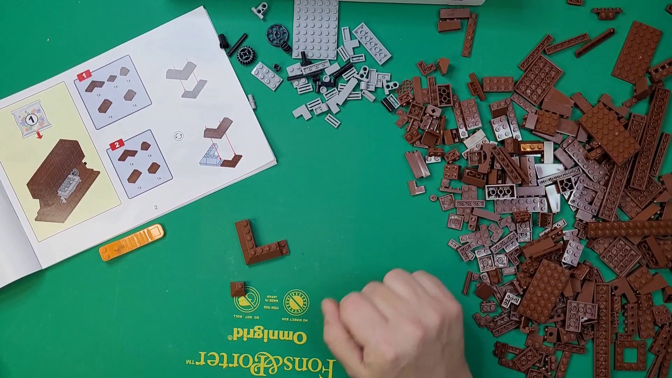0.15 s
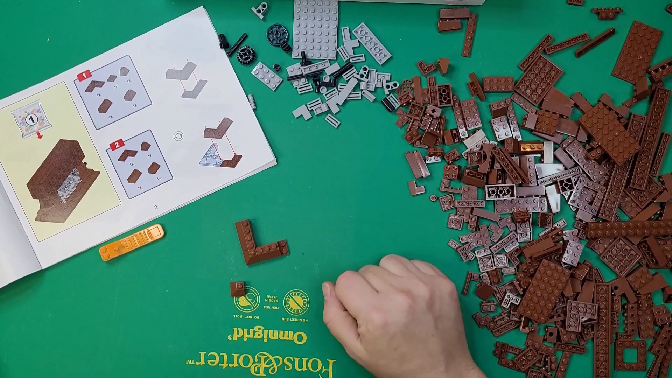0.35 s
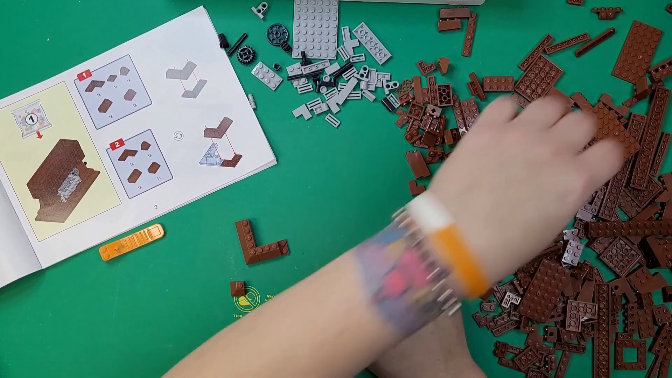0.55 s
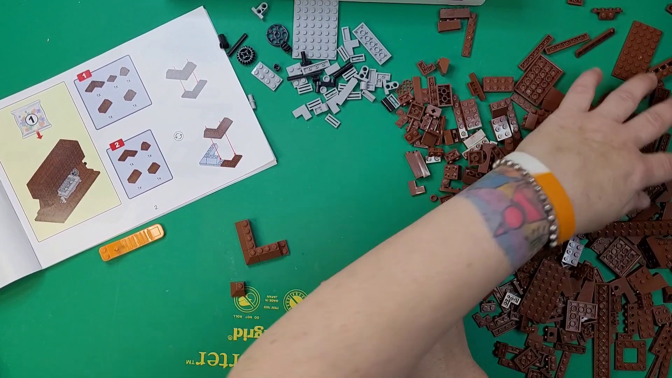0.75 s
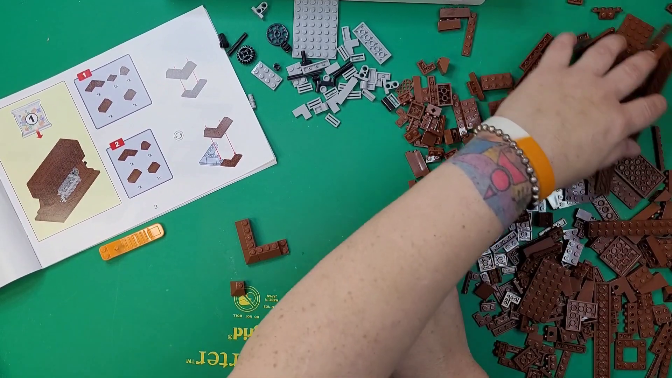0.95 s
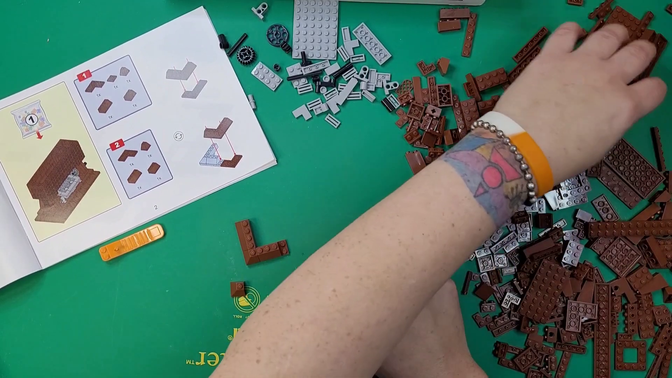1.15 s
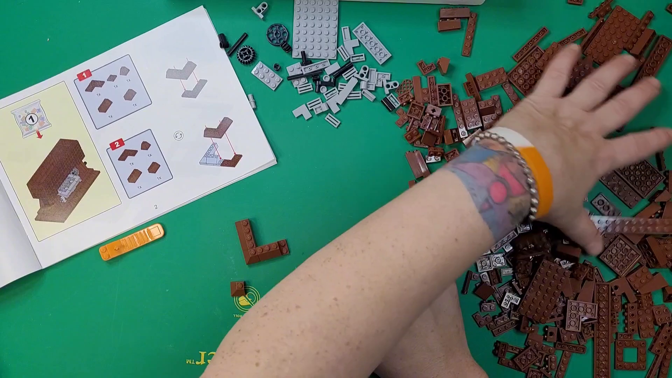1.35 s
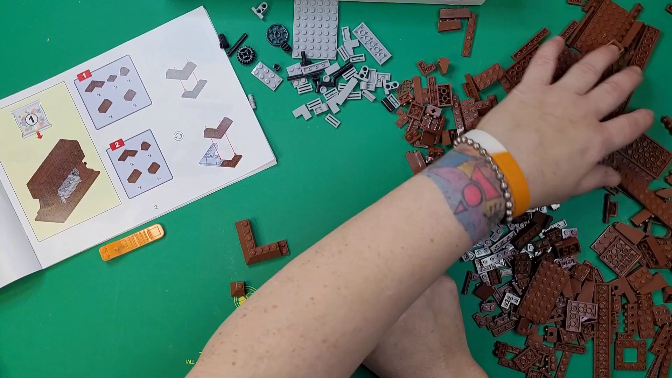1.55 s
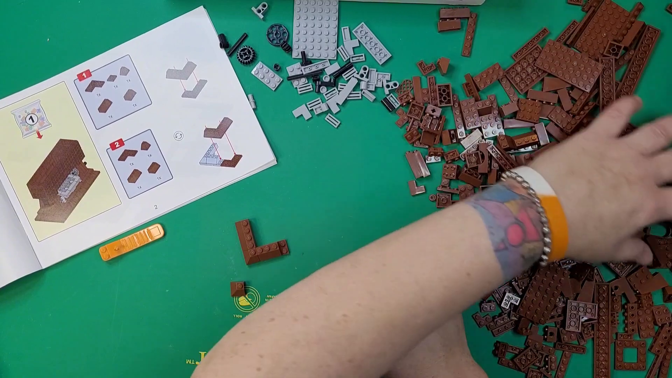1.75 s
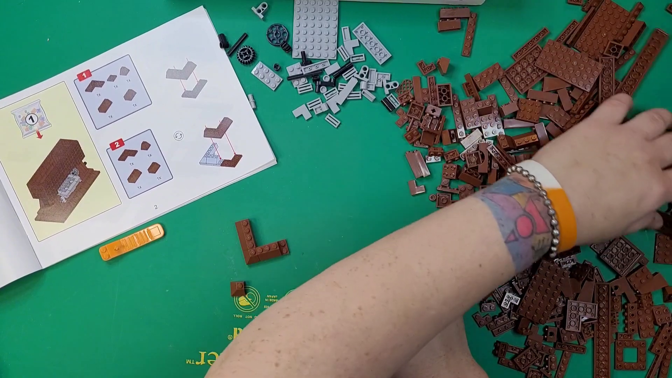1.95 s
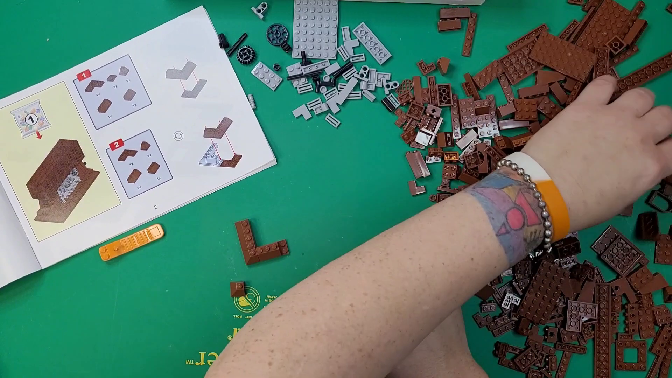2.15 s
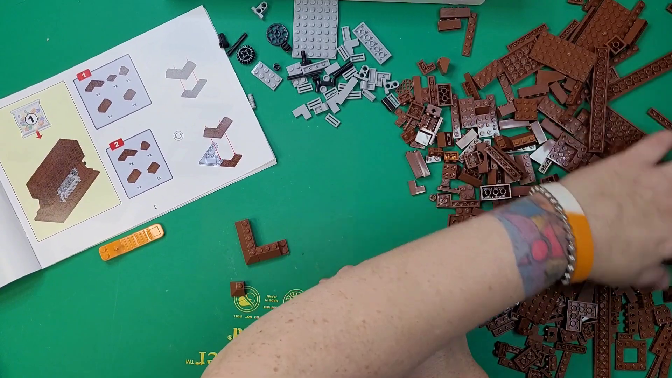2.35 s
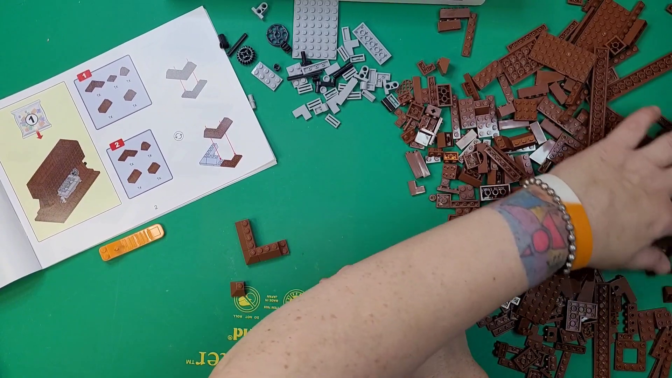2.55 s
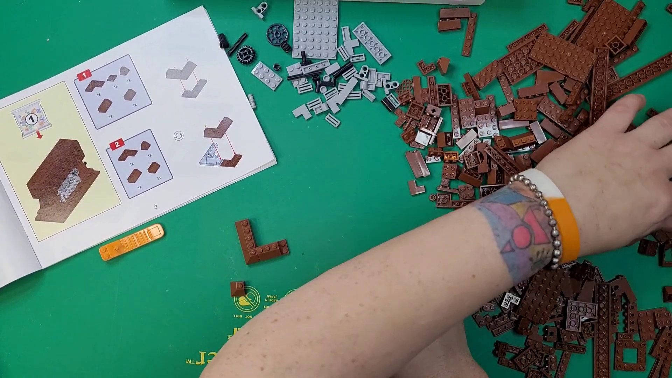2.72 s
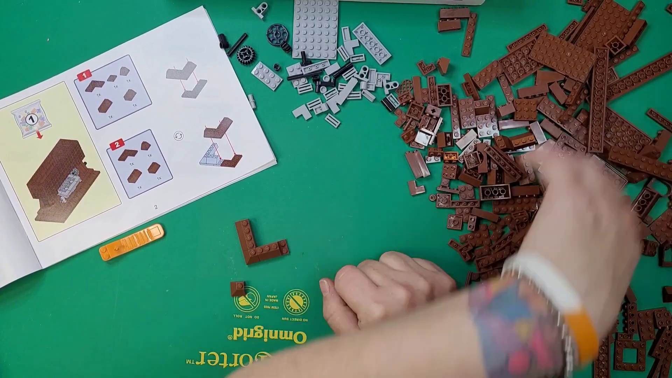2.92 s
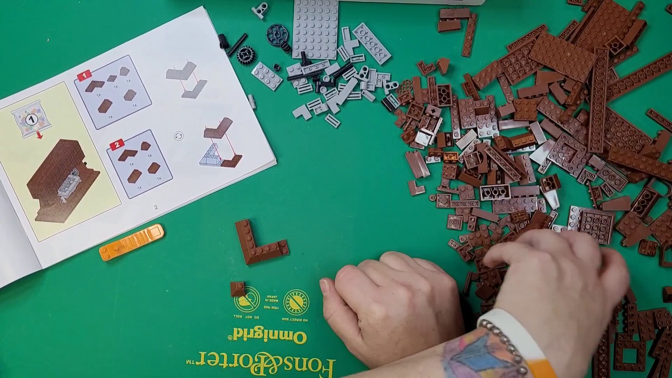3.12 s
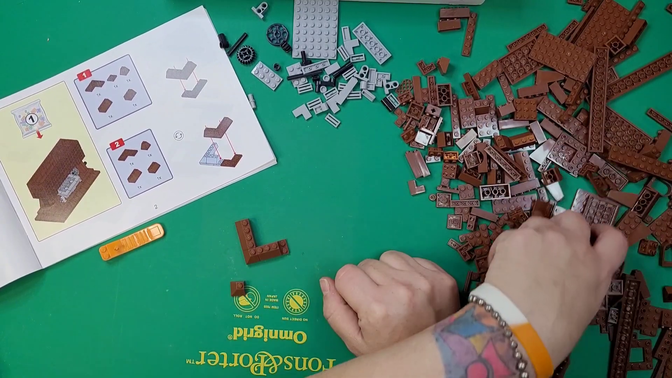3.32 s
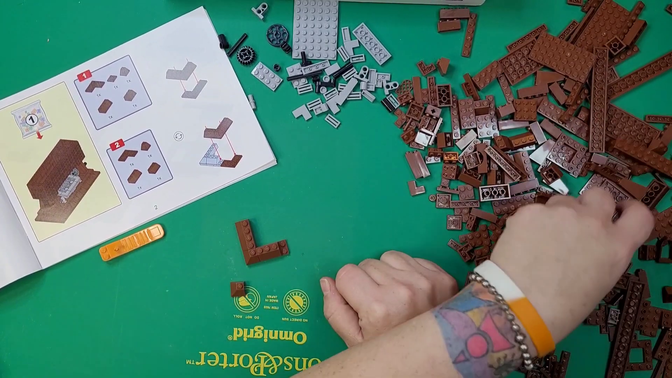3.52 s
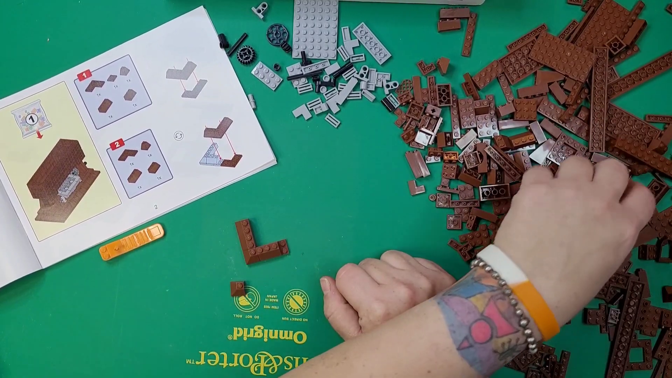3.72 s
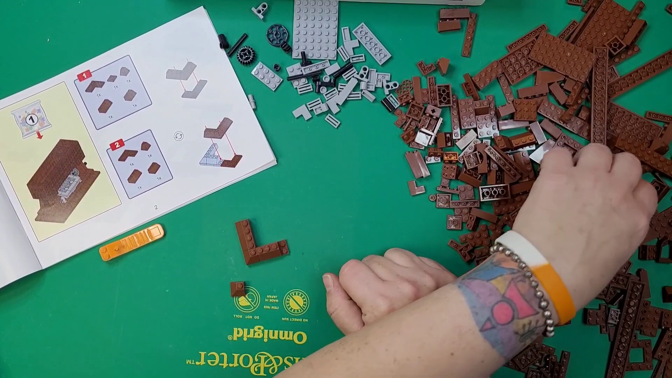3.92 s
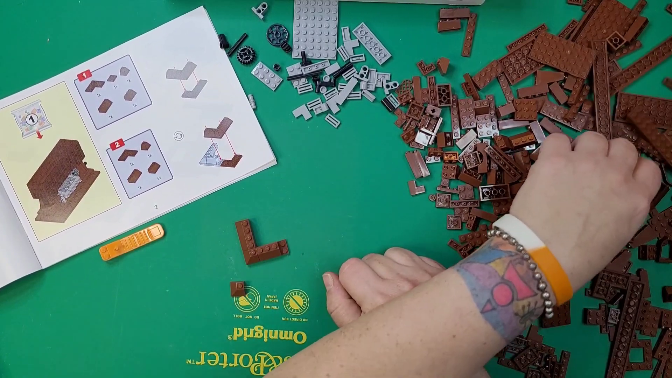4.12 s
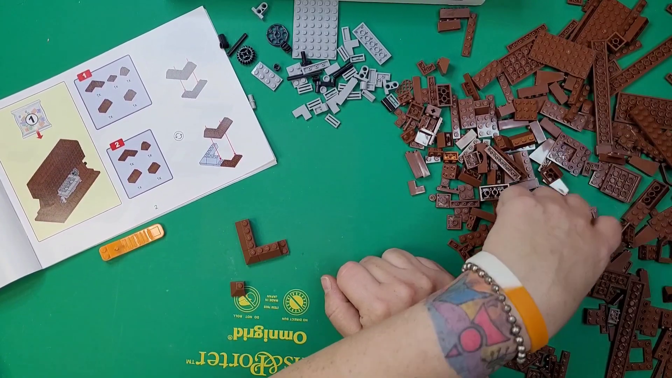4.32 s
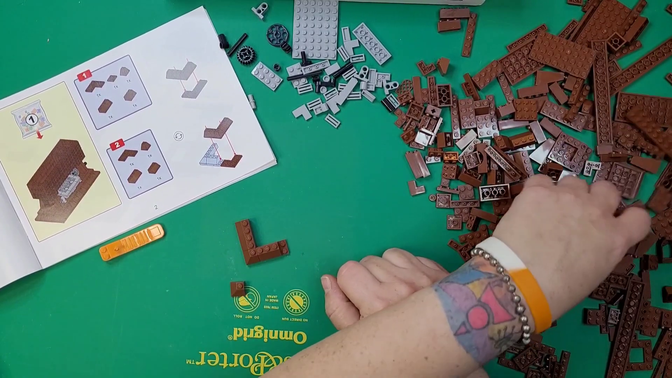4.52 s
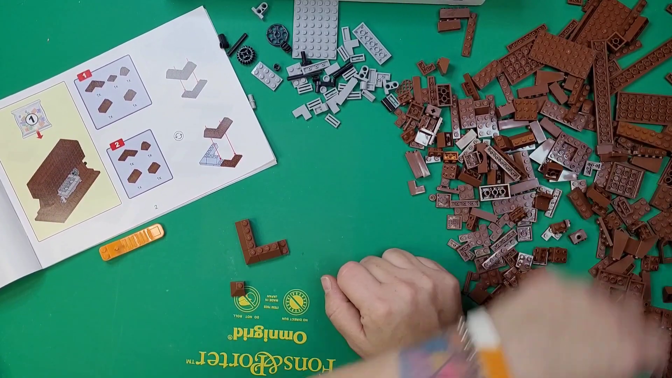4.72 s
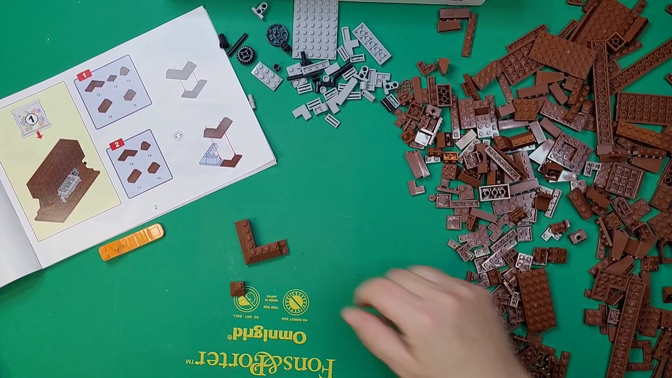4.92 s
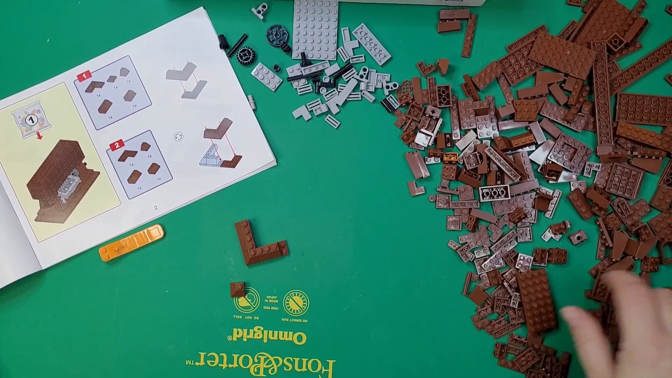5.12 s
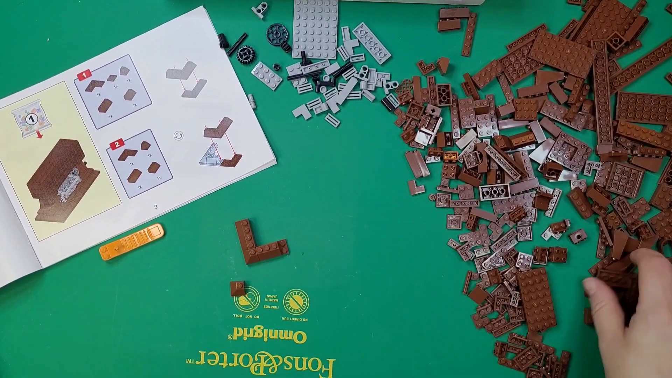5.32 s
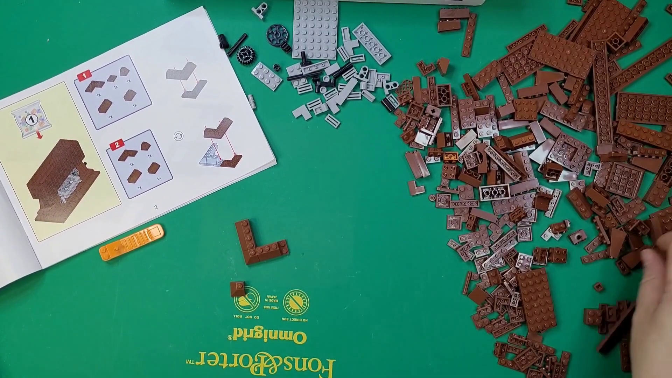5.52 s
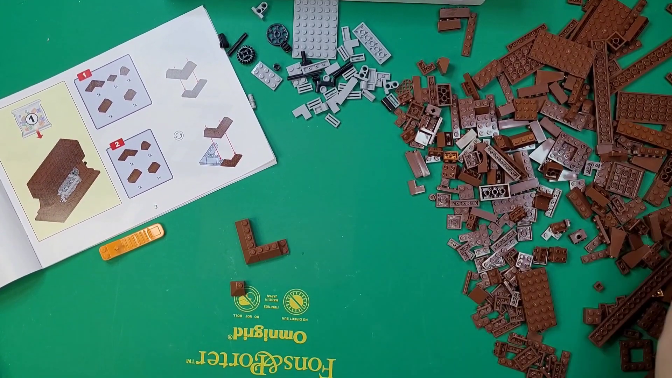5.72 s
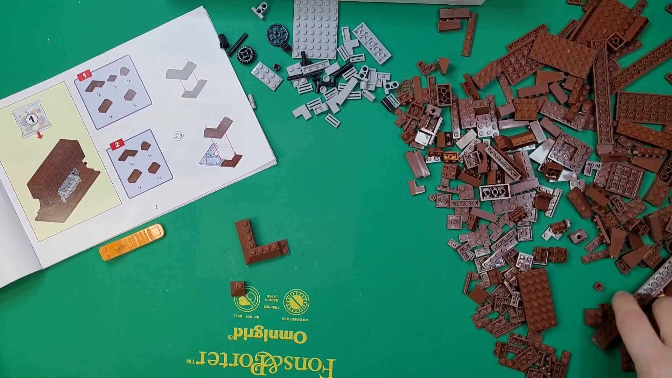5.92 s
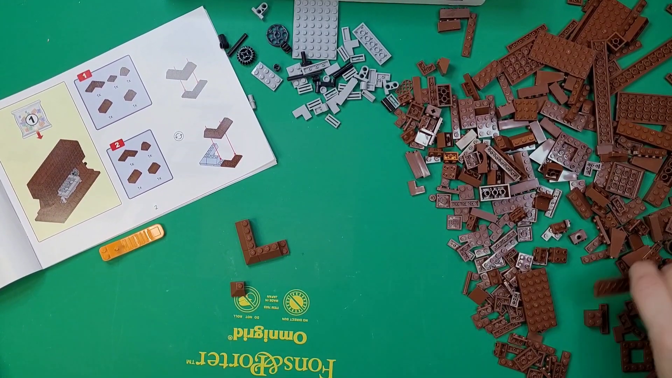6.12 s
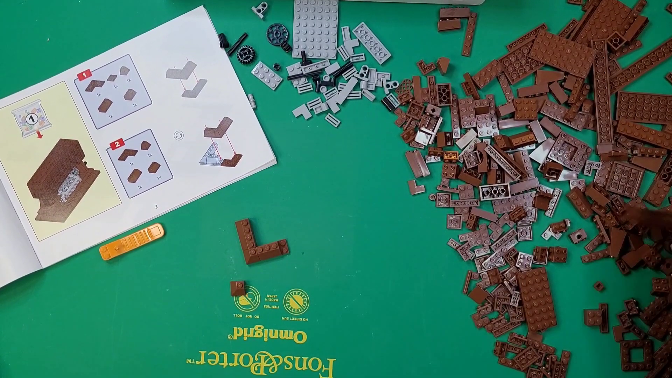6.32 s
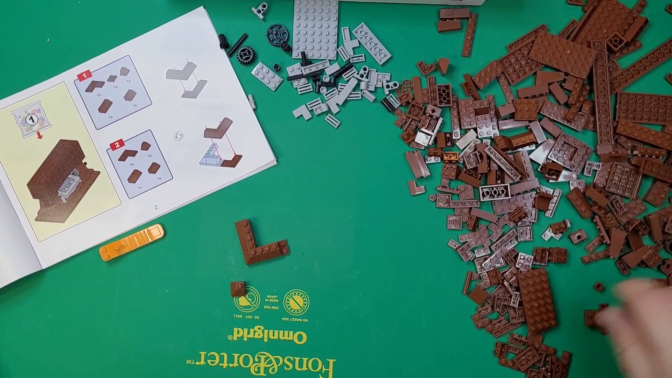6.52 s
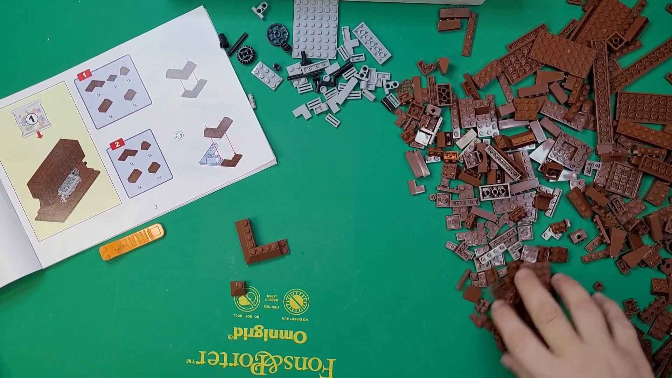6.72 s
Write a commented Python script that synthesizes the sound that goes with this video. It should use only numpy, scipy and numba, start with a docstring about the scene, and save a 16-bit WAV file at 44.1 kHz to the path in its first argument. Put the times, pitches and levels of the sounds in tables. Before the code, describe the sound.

Light plastic pieces patter, scrape and clack in irregular handfuls, nearer the left side. Quiet at first, then several rakes in a row, a gap around three seconds, more stirring with dull arm bumps on the table, a hush with skin brushing the mat, and a last run of crisp clicks that dies away. Dry, close and bright, with slight small-room echo and very faint rumble and hiss.

```python
"""A hand rakes through a heap of small hollow plastic bricks on a mat-covered table, in short sweeps.
Bricks patter as dying sines and a few clack loudly; scraping noise rings larger pieces and the table top.
Narrow-band noise makes pieces sing and a large plate knock; skin brushes the mat, palm and arm touch down.
Two microphone ports stand a few centimetres apart, the heap nearer the left one.
A small room answers the heap, over quiet rumble and hiss."""
import sys
import numpy as np
from scipy import signal
from scipy.fft import rfft, irfft, next_fast_len
from scipy.io import wavfile
from scipy.ndimage import uniform_filter1d
from numba import njit

SR = 44100
rng = np.random.default_rng(int(sys.argv[2]) if len(sys.argv) > 2 else 0)


def put_to_file(sound):
    """Save the sound as 16-bit audio at rate SR, in the file named by the first command-line argument."""
    columns = np.atleast_2d(sound).T  # one column per channel
    safe = np.clip(columns, -1, 1)
    whole_steps = np.round(safe * 32767)
    wavfile.write(sys.argv[1], SR, whole_steps.astype(np.int16))


N = 298160

# resonances of larger flat pieces: pitch_hz, width_hz, level_db
PLATE_MODES = [(947, 67, -14.5), (1227, 43, -3), (1468, 44, 2.5), (1663, 79, 10.5), (1923, 230, 4.5),
               (2360, 39, -5.5)]
# resonances of the table top, lowest first: pitch_hz, width_hz, level_db
TABLE_MODES = [(68, 23, -5.5), (127.8, 19.3, -3.5), (177.4, 7.9, -0.5), (257, 53, -1.5), (310, 33, 5.5),
               (493, 91, -17)]
# typical delay from left port to right, and how far places in the heap vary it
PORT_LAG_S, LAG_SPREAD_S = .00025, .00006


def sweeps():
    """Ticks, plates and table swell together; the heap slips in uneven little jolts."""
    # the heap gives way in surges; the shortest are brief clatter following a clack:
    # full_s (when fully up), rise_s, hold_s, fade_s (scaled per layer below),
    # clatter_db, then treble_db, plate_db, table_db relative to the clatter
    surges = [(0.897, 0.01, .035, 0.095, -42.5, -2.5, -10, -17),
              (0.956, 0.019, .005, 0.041, -40.5, -7, -13, -10),
              (1.049, 0.11, .04, 0.21, -36.5, -2, -8, -12.5), (1.362, 0.02, .002, 0.11, -59, 0.5, -7, 1),
              (1.433, 0.0065, .2, 0.15, -38, -3, -10, -16.5),
              (1.794, 0.0021, .002, 0.084, -53.5, -19.5, -0.5, -11),
              (1.947, 0.017, .002, 0.16, -38, -7, -21.5, -22),
              (1.993, 0.057, .01, 0.12, -38, 0.5, -6.5, -15.5),
              (2.082, 0.092, .03, 0.38, -53.5, -9, -1, -8.5),
              (2.19, 0.086, .002, 0.23, -38, -6.5, -11, -16),
              (2.304, 0.0013, .004, 0.0052, -35.5, 6.5, -6, -15.5),
              (2.524, 0.015, .08, 0.1, -37.5, -6, -10.5, -11.5),
              (2.632, .04, .11, 0.11, -44.5, 0.5, -4.5, -16),
              (2.865, 0.033, .002, 0.095, -63.5, 2, -19, -1.5), (3.241, .002, .002, 0.1, -61, -9, -27, -20),
              (3.348, 0.073, .2, 0.19, -39, 0, -9.5, -15),
              (3.718, .002, .002, 0.016, -49.5, -17.5, -5.5, -10.5),
              (3.781, .004, .002, 0.09, -67, -12, -16, 3), (3.924, .002, .05, 0.15, -50.5, -4.5, -10, -10),
              (4.068, 0.0093, .002, 0.11, -45.5, -7, -6, -14),
              (4.188, 0.06, .002, 0.15, -42.5, -7, -6, -14.5),
              (4.438, .012, .002, .14, -30.5, -4, -13.5, -18),
              (4.549, 0.068, .002, 0.18, -34.5, -4, -11, -20),
              (4.617, 0.03, .002, 0.11, -33.5, -1, -11, -18.5),
              (5.449, 0.022, .09, 0.14, -38.5, 0, -9, -11.5),
              (5.608, 0.0035, .002, 0.23, -41.5, -4, -13.5, -15.5),
              (5.735, 0.0093, .002, 0.1, -40.5, -13, -13, -7),
              (5.829, 0.0042, .07, 0.028, -45, -10, -21, -19),
              (5.961, 0.0052, .002, 0.018, -56.5, -5.5, -13, -11.5),
              (6.067, 0.035, .002, 0.19, -47.5, -6.5, -13, -9), (6.15, .004, .002, 0.07, -48, -4, -16, -25),
              (6.171, .003, .002, 0.095, -50, -3.5, -17, -25),
              (6.436, 0.0042, .002, 0.025, -35.5, -14, -22, -11.5),
              (6.463, 0.0058, .002, 0.17, -37.5, -9.5, -16, -14),
              (6.546, .003, .002, 0.037, -41, 1, -4, -6), (6.598, 0.026, .002, 0.13, -48.5, -7, -5, -7)]
    full_s, rise, hold, fade, clatter_db, treble_db, plate_db, table_db = np.transpose(surges)

    def push(fade_scale, more_db):
        return swells(full_s, rise, hold, fade * fade_scale, clatter_db + more_db)

    jolts = undb(1.67 * walk(130))
    body = ticks(count=6000, lo_hz=2290, hi_hz=8423, t60=0.0089, spread_db=3.5)
    treble = ticks(count=9000, lo_hz=7270, hi_hz=17100, t60=0.0015, spread_db=2.5)
    knocks = ticks(count=2500, lo_hz=703, hi_hz=2530, t60=0.0079, spread_db=3.5)
    scrape = rng.standard_normal(N) * undb(1.5 * walk(200))
    scraped_plates = level(above(resonate(scrape, PLATE_MODES), 310), 2.1)
    plates = undb(-6.5) * knocks + ports(scraped_plates)
    table = ports(level(resonate(scrape, TABLE_MODES[1:]), -1.7))
    # heavier things settle later
    clatter = push(0.76, 0) * body + push(0.74, treble_db) * treble
    return jolts * (clatter + push(0.99, plate_db) * plates + push(1.29, table_db) * table)


def ticks(count, lo_hz, hi_hz, t60, spread_db):
    """A dense random patter of tiny collisions, each ringing three modes at once from its own place; rms 1."""
    hit = np.repeat(rng.random((count, 3)), 3, axis=0).T  # moment, strength, place
    mode = rng.random((3 * count, 3)).T  # pitch, ring time, weakness
    strength = np.minimum(-np.log(1 - hit[1]), 4.5)  # few strong hits among many weak ones
    size = undb(spread_db * strength - 9.3 * mode[2])
    lag = np.clip(PORT_LAG_S + LAG_SPREAD_S * 4 * (hit[2] - .5), 0, 1)
    hz = np.clip(lo_hz * (hi_hz / lo_hz) ** mode[0], 50, .45 * SR)
    ring_time = t60 * (0.16 + 2.4 * mode[1])
    rings = ring(np.zeros((2, N)), hit[0] * N / SR, hz, ring_time, size, lag)
    return level(above(rings, 0.53 * lo_hz), 0)


def clacks():
    """Each clack is two dozen tiny rings within about 3 ms: brick modes, a bright crack; plates and table knock."""
    # single clacks: start_s, level_db, ring_hz, then treble_db, plate_db, table_db relative to the level
    clack_list = [(0.897, -38.5, 5820, -6.5, -21, -18.5), (0.9173, -24, 4760, -22, -12, -8),
                  (0.959, -25, 4840, -22.5, -14, -18), (1.1734, -32.5, 7070, -23, -25, -6),
                  (1.3503, -47.5, 4670, 2, -13.5, -15.5), (1.4345, -27, 5000, 0.5, -36, -36),
                  (1.459, -32, 3160, -19, -32, -33), (1.5038, -25.5, 3200, -6, -31, -27.5),
                  (1.5231, -29.5, 3130, -6, -15, -34), (1.6225, -28, 7700, -4.5, -28, -24.5),
                  (1.705, -35, 4600, -11.5, -19, -28), (1.794, -40.5, 6380, -10, -20.5, -26),
                  (1.817, -51, 5000, -8.5, -16, -29), (1.93, -39, 5500, -18, -22, -23),
                  (1.94, -39, 7950, -17, -20, -33.5), (1.9529, -26, 7930, -17.5, -24, -27),
                  (2.1124, -38.5, 4300, -8.5, -13, -24), (2.1317, -32, 2960, -19, -13, -16.5),
                  (2.1535, -30, 4730, -24, -19, -31.5), (2.3068, -26, 3040, -18.5, -15.5, -35),
                  (2.49, -56.5, 4600, -14.5, -24, -25.5), (2.5168, -35, 4200, -11.5, -13.5, -9),
                  (2.5484, -26, 2800, -2, -29, -20.5), (2.5838, -23, 3880, -16, -19.5, -11),
                  (2.621, -23, 7800, -11, -31, -38.5), (2.65, -30, 4340, -11, -17, -25),
                  (2.69, -31.5, 2850, -10, -13.5, -36), (2.7271, -38.5, 4100, -22.5, -19, -30),
                  (2.7738, -42, 2460, 2, -14, -27.5), (2.796, -52, 3140, -11, -13, -20),
                  (2.8552, -50, 3220, -7, -12, -26), (3.2404, -46, 6800, -31, -24, -18),
                  (3.2877, -40, 6960, -5, -15, -14), (3.313, -31.5, 4200, -4, -27, -34),
                  (3.3314, -33, 4100, 1, -25, -27), (3.4202, -29, 4040, -17, -40, -31),
                  (3.6138, -28, 5900, -19, -22, -26), (3.717, -37.5, 2680, -2.5, -23, -26),
                  (3.7808, -47, 6120, -29, -31, -20), (3.923, -37.5, 4370, -19, -39, -23),
                  (3.9526, -35, 2600, -0.5, -42, -29.5), (4.0719, -28.5, 4800, -24, -26.5, -38),
                  (4.1597, -46, 4500, -20, -13, -26.5), (4.2106, -31, 4930, -20, -27, -19),
                  (4.4276, -37.5, 7070, -25, -32, -20), (4.435, -25, 4170, -30.5, -32, -10),
                  (4.5982, -23.5, 5900, -17, -26, -23), (4.6167, -28, 2400, -12, -26, -13.5),
                  (4.6354, -25, 7700, -5, -18.5, -35), (4.6476, -30, 6060, -14, -20, -11),
                  (4.6759, -34, 4900, -12, -22, -26), (4.7521, -46, 4900, -20, -24, -27),
                  (4.7666, -56, 5030, -10, -28, -17), (5.421, -45, 4100, -20, -29, -29),
                  (5.4407, -23.5, 4030, -8, -34, -15), (5.461, -21.5, 7100, -7.5, -29, -35),
                  (5.4685, -30, 4200, -1, -25, -29), (5.488, -22.5, 4400, -13.5, -27, -38),
                  (5.5232, -24.5, 4020, -10, -17.5, -28), (5.6031, -28, 7900, -12.5, -15, -35),
                  (5.6693, -27, 7840, -27, -22.5, -14.5), (5.6903, -35.5, 6140, -24, -23, -30),
                  (5.726, -38.5, 7700, -21, -21, -24), (5.7355, -28, 3900, -6, -10.5, -34),
                  (5.7755, -23, 3100, -12, -22.5, -35), (5.83, -22, 7730, -15, -29, -36),
                  (5.8412, -27, 7900, -26, -28.5, -19), (5.8655, -40, 3960, -11, -17, -33),
                  (5.885, -30.5, 7860, -7, -27, -29), (5.896, -37, 7960, -10, -32, -31),
                  (5.9622, -42, 4160, -1.5, -30, -37), (6.0393, -41.5, 6950, -9, -33, -13),
                  (6.0483, -34, 2530, -17, -31, -6.5), (6.087, -33, 7840, -20, -20, -33),
                  (6.1424, -34.5, 2700, -3.5, -19, -47), (6.171, -29, 6150, -8, -22.5, -36),
                  (6.434, -25, 7060, -14, -29, -25), (6.4662, -15.5, 7380, -15, -17, -12.5),
                  (6.4768, -23.5, 2900, -3.5, -21, -32), (6.5088, -36.5, 5160, 1.5, -5.5, -15),
                  (6.5445, -22.5, 6620, -4.5, -13, -13), (6.5535, -26.5, 2590, -31, -28, -5.5),
                  (6.581, -51, 3100, -18, -18, -10), (6.604, -33, 3000, -6, -13.5, -12),
                  (6.6949, -48, 4240, -7, -9.5, -6)]
    # modes of one hollow brick: pitch_ratio (its power varies per clack), level_db, t60_s
    brick_modes = [(1, 1.5, 0.012), (2.1, -3.5, 0.0086), (.66, -4, 0.011), (2.3, -1.5, .003),
                   (1.8, -9.5, 0.0046), (1.9, -1, 0.0054)]
    start, clack_db, hz, treble_db, plate_db, table_db = np.transpose(clack_list)
    out, plate, table = np.zeros((2, N)), np.zeros(N), np.zeros(N)
    grains = 24
    delay, pitch_draw, place = rng.random((len(start), 3, grains)).transpose(1, 2, 0)
    lag = PORT_LAG_S + LAG_SPREAD_S * 2 * (place[0] - .5)
    for k, (ratio, mode_db, t60) in enumerate(brick_modes):
        pitch = np.clip(hz * ratio ** (.7 + .6 * pitch_draw[k]), 50, .45 * SR)
        size = undb(clack_db + mode_db - 2.0)
        out = ring(out, start + .0015 * delay[k] ** 2, pitch, np.full(len(start), t60), size, lag)
    for k in range(len(brick_modes), grains):  # the bright crack
        pitch = 8000 + 8500 * pitch_draw[k]
        size = undb(clack_db + treble_db + 3.0)
        out = ring(out, start + 0.0032 * delay[k] ** 2, pitch, np.full(len(start), 0.003), size, lag)
    at = (start * SR).astype(int)
    # single-sample knocks need a large drive to ring the resonances up
    plate[at] = undb(clack_db + plate_db + 37.0)
    table[at] = undb(clack_db + table_db + 33.0)
    plate_ring = above(resonate(plate, PLATE_MODES + [(1600, 300, -20)]), 600)
    return above(out, 1800) + ports(plate_ring + resonate(table, TABLE_MODES[2:]))


def drags():
    """Pieces sing and a large plate knocks low: stuttering noise, each in one narrow resonance."""
    # pieces singing at their own pitch, and two low knocks of a large plate near 500 Hz:
    # start_s, length_s, pitch_hz, width_hz, level_db (before fades and stutter)
    drag_list = [(1.362, 0.063, 2220, 249, -62), (0.933, .05, 1620, 149, -58.5),
                 (1.467, 0.081, 3100, 110, -39.5), (2.135, 0.043, 1490, 149.6, -47),
                 (2.53, .07, 2880, 200, -45.5), (2.542, 0.023, 507, 149, -47.5),
                 (2.567, 0.037, 3830, 100, -42), (3.303, 0.095, 4030, 300, -45),
                 (3.546, 0.026, 1610, 120, -39), (4.423, 0.044, 520, 200, -46.5),
                 (4.447, 0.032, 7070, 400, -36), (4.594, 0.044, 2400, 200, -52.5),
                 (5.82, 0.032, 7450, 350, -58), (6.354, 0.063, 1700, 200, -77)]
    t, out, noise = np.arange(N) / SR, np.zeros(N), rng.standard_normal(N)
    for start, length, hz, width, drag_db in drag_list:
        now = (t > start) & (t < start + length)
        to_edge = np.minimum(t[now] - start, start + length - t[now])
        fade = np.clip(to_edge / 0.014, 0, 1)
        out[now] += fade * level(resonate(noise[now], [(hz, width, 0)]), drag_db)
    stutter = undb(1.4 * walk(90))
    return ports(out * stutter)


def arm():
    """Skin brushes the mat as noise, the palm lands once, the resting arm bumps the table's low resonances."""
    # spectrum of skin on the mat: freq_hz, density_db
    rustle_spectrum = [(1470, -21), (2500, -17), (3220, -9.5), (5910, 1), (8640, -6), (14300, -1),
                       (16100, -5.5), (16500, -29.5)]
    # skin brushing the mat: full_s (when fully up), rise_s, hold_s, fade_s, level_db
    brushes = [(0.0, .01, .002, 0.39, -71.5), (.196, 0.051, .1, .2, -70.5), (0.343, .06, .002, 0.22, -70),
               (4.818, .01, 0.0018, .3, -76), (5.004, 0.059, .002, 0.22, -69),
               (5.033, .015, .002, 0.09, -62), (5.192, 0.16, .002, 0.75, -66.5),
               (5.427, .015, .005, .02, -62)]
    # the palm landing softly: centre_s, spread_s, pitch_hz, width_hz, level_db (before the envelope)
    palm_landing = (4.995, .03, 700, 1200, -66)
    # the arm shifting on the table, dull bumps: full_s (when fully up), rise_s, level_db
    arm_bumps = [(0.0, 0.6, -61.5), (.32, 0.11, -60.5), (1.18, 0.086, -60), (1.5, 0.31, -58.5),
                 (2.16, .2, -61.5), (2.56, 0.044, -58), (2.75, 0.19, -60.5), (3.35, .14, -58),
                 (3.58, 0.086, -48.5), (3.97, 0.064, -53.5), (4.1, 0.041, -55), (4.48, 0.047, -46),
                 (4.92, 0.12, -68), (5.22, 0.75, -63), (5.46, 0.083, -57.5), (5.67, 0.083, -55),
                 (5.84, 0.028, -47), (5.93, 0.03, -56), (6.07, .06, -55), (6.52, 0.15, -60),
                 (6.76, .1, -67)]
    rustle = level(colour(rng.standard_normal((2, N)), rustle_spectrum), 0)
    rustle = rustle * swells(*np.transpose(brushes)) * undb(2.5 * walk(29))
    centre, spread, hz, width, palm_db = palm_landing
    palm = level(resonate(rng.standard_normal((2, N)), [(hz, width, 0)]), palm_db)
    palm = palm * np.exp(-((np.arange(N) / SR - centre) / spread) ** 2)
    push = rng.standard_normal(N) * undb(1.3 * walk(25))
    bumps = level(resonate(push, TABLE_MODES[:3]), 0)
    full_s, rise, bump_db = np.transpose(arm_bumps)
    return rustle + palm + bumps * swells(full_s, rise, 0, 3.2 * rise, bump_db)


def room(dry):
    """Diffuse echoes of the left port's sound, each band dying at its own rate, different at each port."""
    # echo decay, one row per band from low to high: freq_hz (nominal), t60_s
    band_t60 = [(200, 0.25), (1500, 0.16), (5000, 0.2), (12000, 0.13)]
    t = np.arange(SR // 2) / SR
    edges = [60, 600, 2800, 8000, 18000]  # Hz
    echo = 0
    for (_, t60), lo, hi in zip(band_t60, edges, edges[1:]):
        bandpass = signal.butter(2, [lo, hi], "bandpass", fs=SR, output="sos")
        band = signal.sosfilt(bandpass, rng.standard_normal((2, len(t))))
        alike = np.clip(1.1 - lo / 900, 0, .85)  # long waves are more alike at the two ports
        band[1] = alike * band[0] + np.sqrt(1 - alike ** 2) * band[1]
        onset = np.clip(t / 0.0019 - .5, 0, 1)
        echo = echo + band * undb(-60 * t / t60) * onset
    echo = echo / np.sqrt(np.sum(echo ** 2, axis=1, keepdims=True))
    return undb(-4.5) * signal.fftconvolve(dry[:1], echo, axes=1)[:, :N]


def air():
    """Quiet room rumble and hiss as shaped noise; the bass is more alike at the two ports."""
    # spectrum of the empty room: freq_hz, density_db
    air_spectrum = [(12, -30), (20, -8), (60, 4), (175, -6.5), (326, -5), (419, -27), (716, -31),
                    (1190, -37), (2270, -39), (2850, -44), (8080, -40), (14600, -41), (16800, -50)]
    mid, side = colour(rng.standard_normal((2, N)), air_spectrum)
    side = colour(side, [(100, -8.5), (400, 0), (1200, 13.5), (16000, -1)])
    return level(np.array([mid + side, mid - side]), -66.5)


def undb(db):
    """Decibels to amplitude."""
    return 10 ** (np.asarray(db) / 20)


def level(x, db):
    """Set the rms level in dB."""
    return x * undb(db) / np.sqrt(np.mean(x ** 2))


def colour(x, points):
    """Filter by a (Hz, dB) spectrum, interpolated over log frequency."""
    hz, db = np.transpose(points)
    size = next_fast_len(N)
    f = np.arange(size // 2 + 1) * SR / size + 1  # 1 Hz up, to keep the log finite
    gain = undb(np.interp(np.log(f), np.log(hz), db))
    return irfft(rfft(x, size) * gain, size)[..., :N]


def above(x, hz):
    """Small pieces radiate nothing far below their lowest mode: a high-pass."""
    return signal.sosfilt(signal.butter(2, hz, "highpass", fs=SR, output="sos"), x)


def resonate(x, modes):
    """Sum of fixed (Hz, width Hz, dB) resonances."""
    return sum(undb(db) * signal.lfilter(*signal.iirpeak(hz, hz / width, SR), x) for hz, width, db in modes)


@njit
def ring(out, start, hz, t60, size, lag):
    """Each grain is a dying sine, reaching the right port a little later."""
    for k in range(len(start)):
        turn = np.exp(2j * np.pi * hz[k] / SR - np.log(1000) / (t60[k] * SR))  # spin and decay per sample
        z = size[k] + 0j
        left, right = int(start[k] * SR), int((start[k] + lag[k]) * SR)
        for n in range(min(int(t60[k] * SR), out.shape[1] - max(left, right))):
            z *= turn
            out[0, left + n] += z.imag
            out[1, right + n] += z.imag
    return out


def ports(x):
    """A sound from the heap: the right port hears it later."""
    return np.array([x, np.roll(x, int(PORT_LAG_S * SR))])


def walk(rate):
    """Random levels, a new one every 1 / rate s, joined by straight slopes; spread a little under 1."""
    k = int(SR / rate)
    return uniform_filter1d(np.repeat(rng.standard_normal(N // k + 1), k), k)[:N]


def swells(full_s, rise, hold, fade, db):
    """Gain of many gestures, powers added: each rounds up from -20 dB in its rise, holds, then loses 30 dB per fade."""
    t = np.arange(0, N / SR + .002, .001)[:, None]  # 1 ms steps
    before = np.maximum(full_s - t, 0) / rise
    after = np.maximum(t - full_s - hold, 0) / fade
    power = np.sum(undb(db - 20 * before ** 2 - 30 * after) ** 2, axis=1)
    return np.interp(np.arange(N) / SR, t[:, 0], np.sqrt(power))


def scene():
    """Heap with its room echo, shadowed at the right port, plus the arm and the air."""
    # response of the shadowed right port to the heap: freq_hz, gain_db
    right_port = [(30, 8.5), (125, 4), (500, -0.5), (1000, -0.5), (4000, -2), (7300, 0.5), (8200, -8.5),
                  (15000, -6.5)]
    heap = sweeps() + drags() + clacks()
    heap = heap + room(heap)
    return np.array([heap[0], colour(heap[1], right_port)]) + arm() + air()


def record(dry):
    """Microphone colour; the recorder cuts the top."""
    # microphone response: freq_hz, gain_db
    mic_response = [(15, 2), (45, -2.5), (7000, -1.5), (9500, -0.5), (12000, 1.5), (14500, 1.5),
                    (16000, -3.5)]
    top_hz = 15900
    low_pass = signal.ellip(10, .2, 70, top_hz, fs=SR, output="sos")
    return signal.sosfilt(low_pass, colour(dry, mic_response))


dry = scene()
out = record(dry)
put_to_file(out)
```